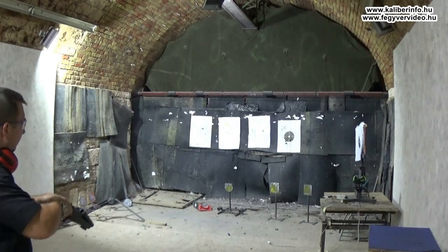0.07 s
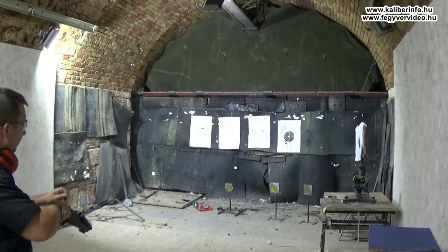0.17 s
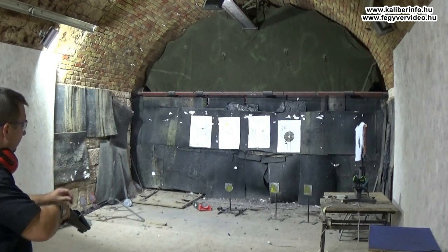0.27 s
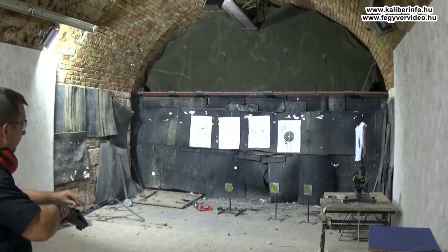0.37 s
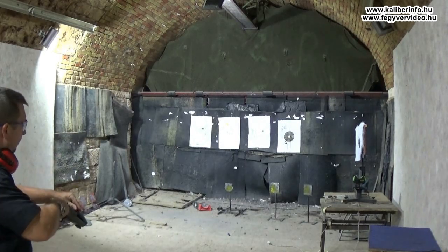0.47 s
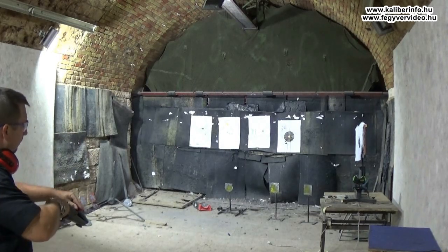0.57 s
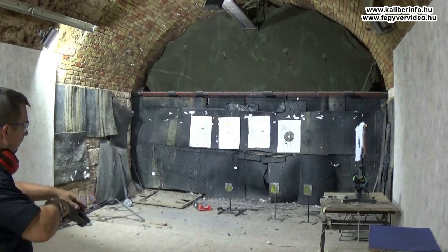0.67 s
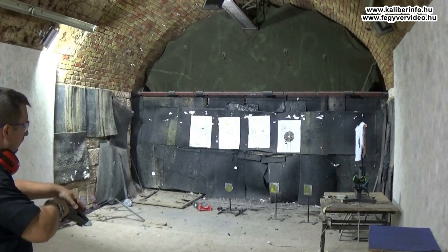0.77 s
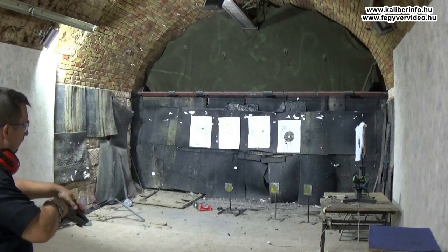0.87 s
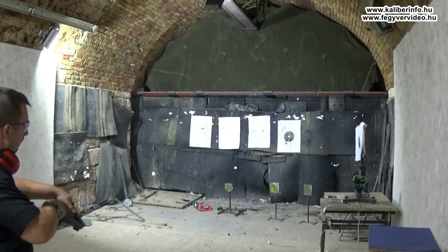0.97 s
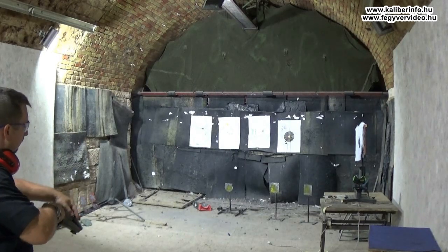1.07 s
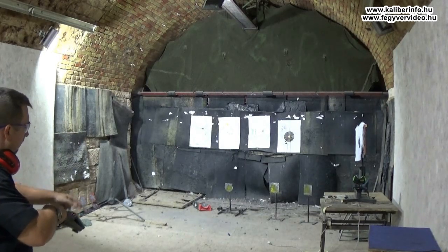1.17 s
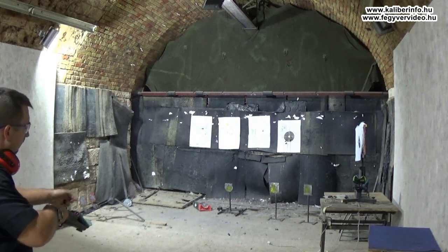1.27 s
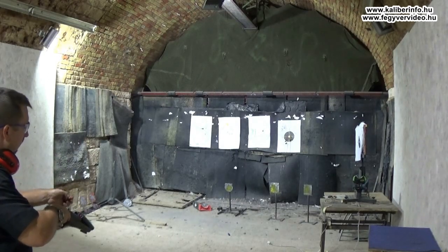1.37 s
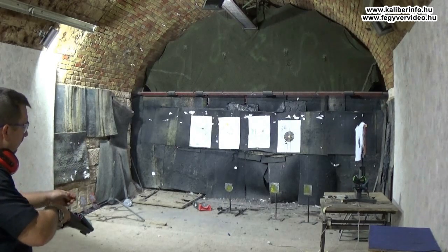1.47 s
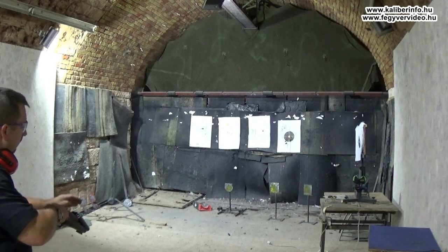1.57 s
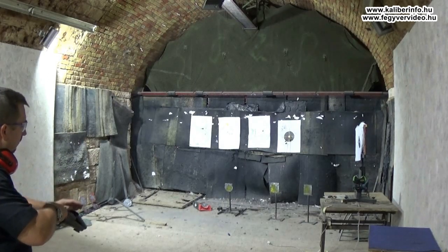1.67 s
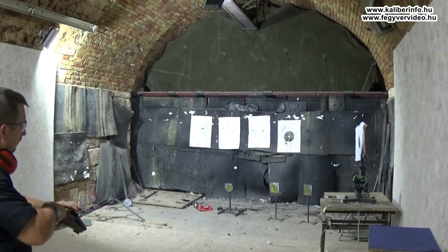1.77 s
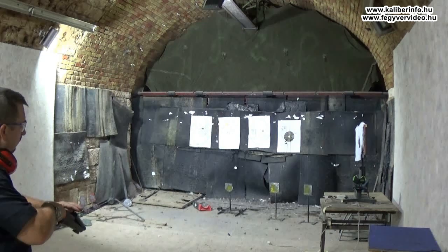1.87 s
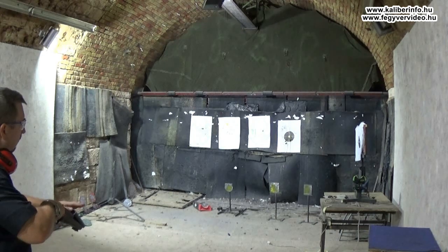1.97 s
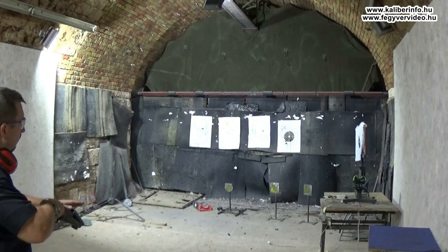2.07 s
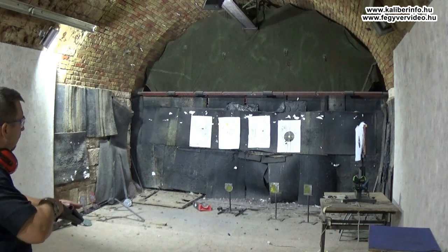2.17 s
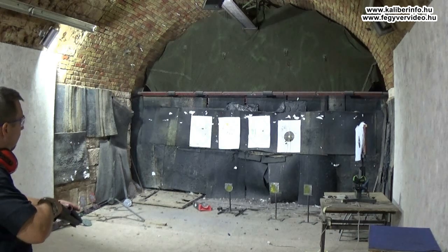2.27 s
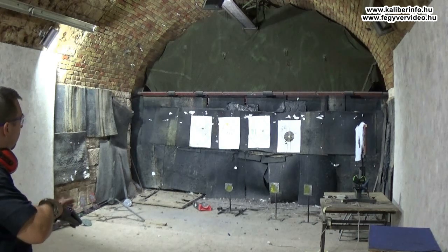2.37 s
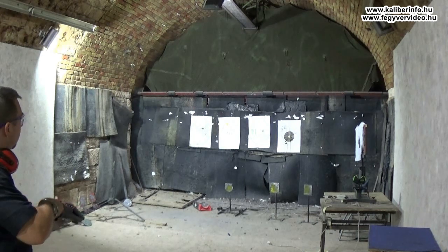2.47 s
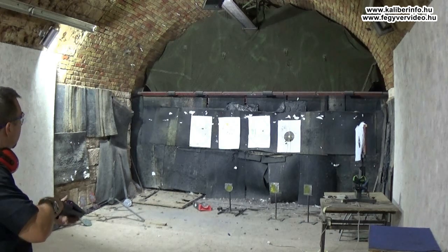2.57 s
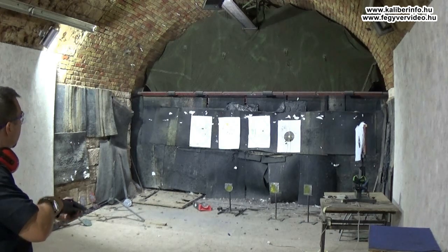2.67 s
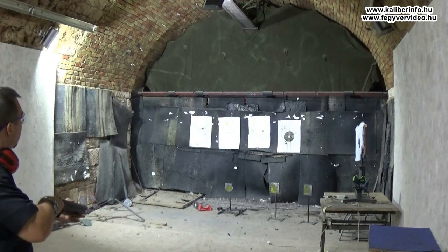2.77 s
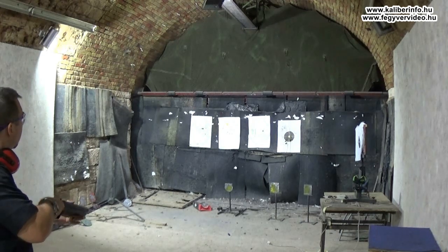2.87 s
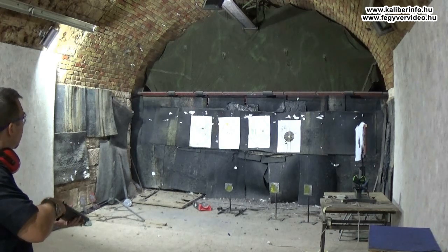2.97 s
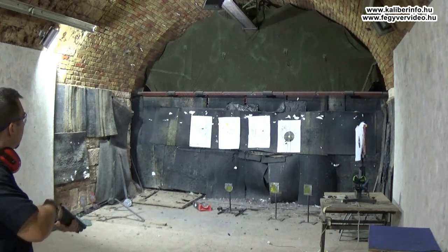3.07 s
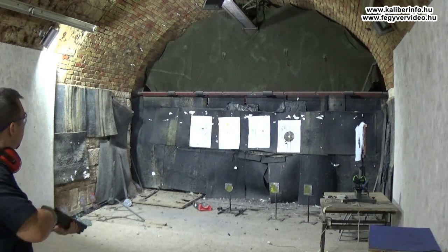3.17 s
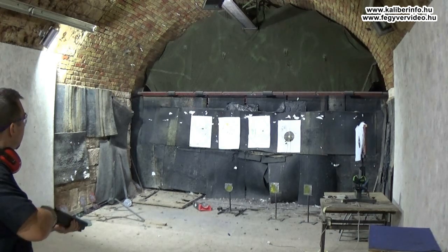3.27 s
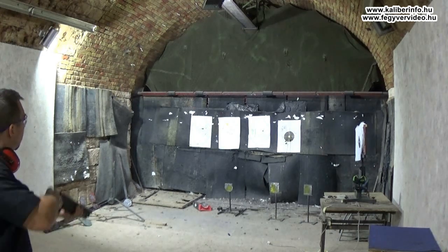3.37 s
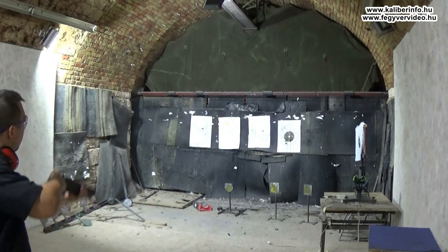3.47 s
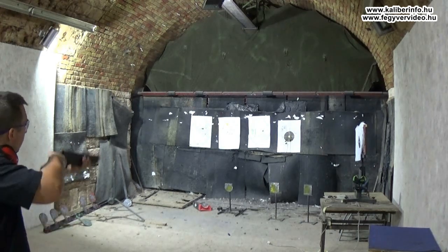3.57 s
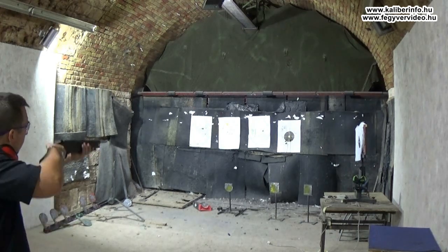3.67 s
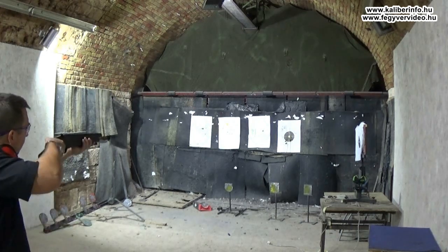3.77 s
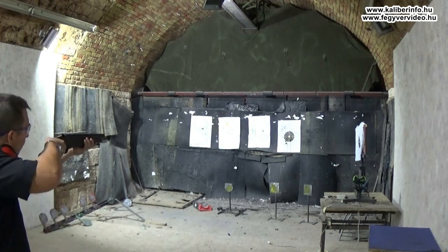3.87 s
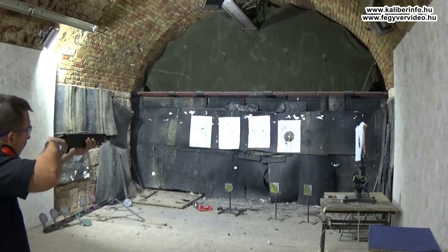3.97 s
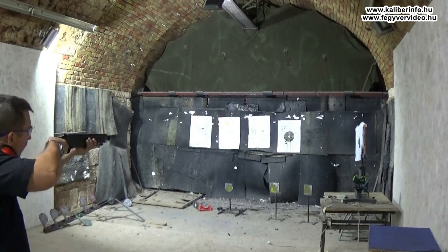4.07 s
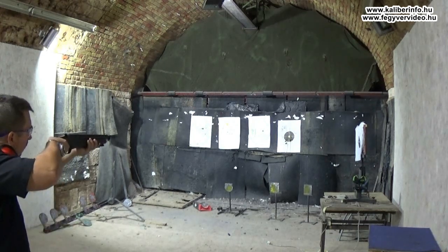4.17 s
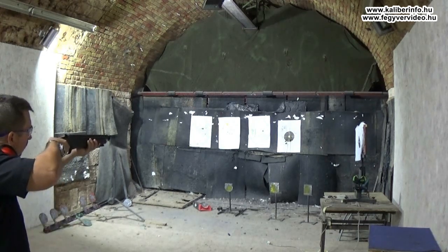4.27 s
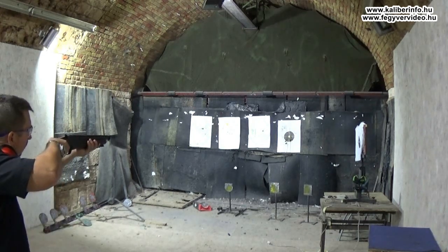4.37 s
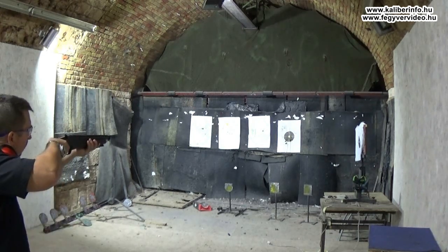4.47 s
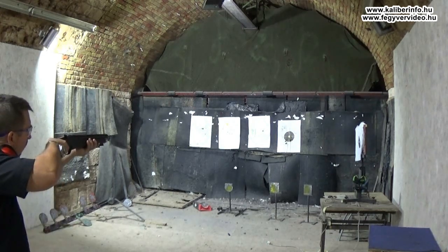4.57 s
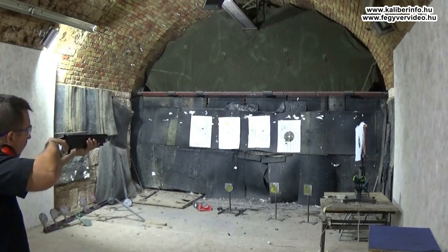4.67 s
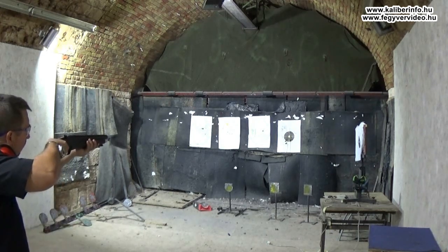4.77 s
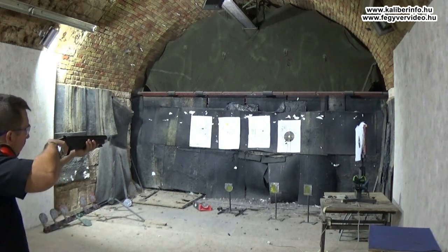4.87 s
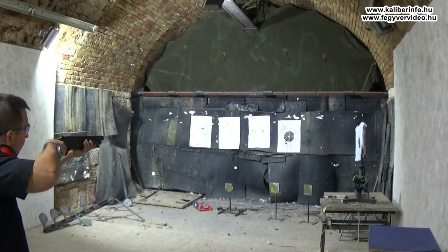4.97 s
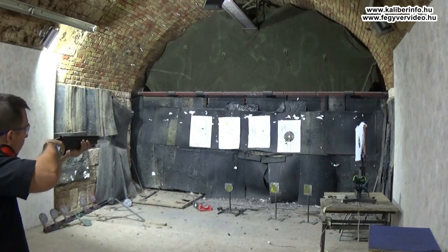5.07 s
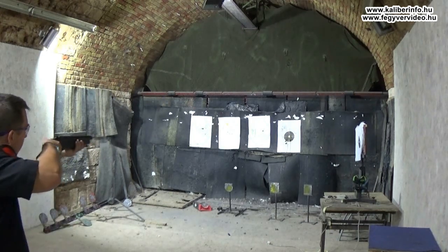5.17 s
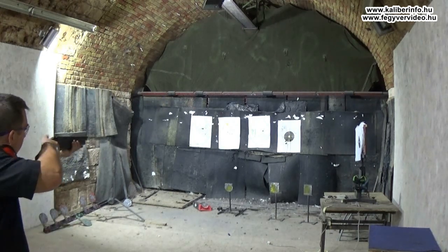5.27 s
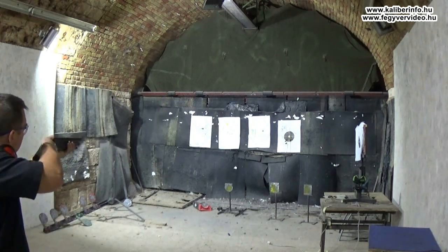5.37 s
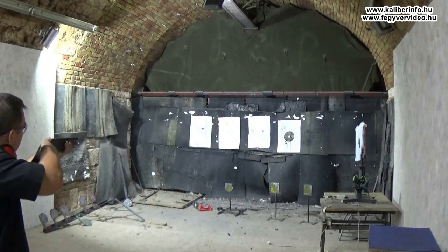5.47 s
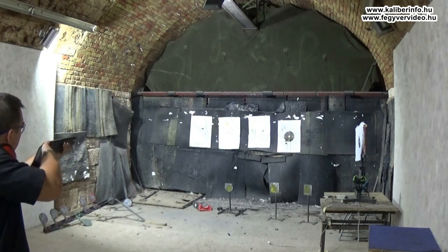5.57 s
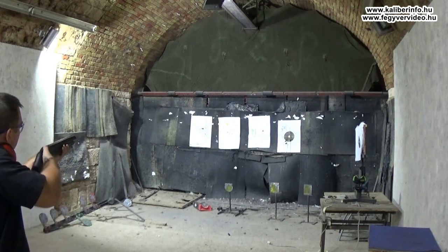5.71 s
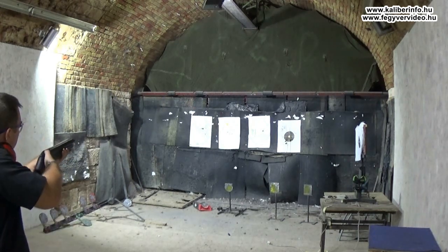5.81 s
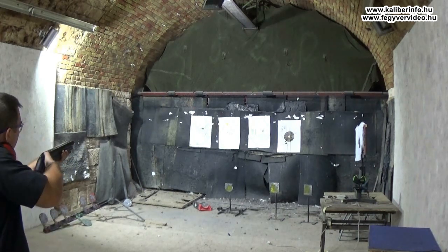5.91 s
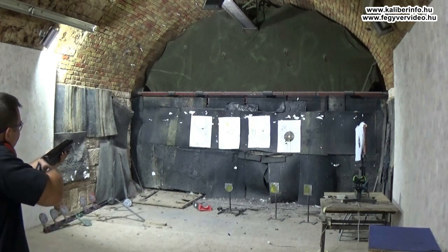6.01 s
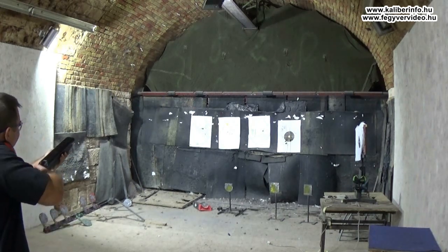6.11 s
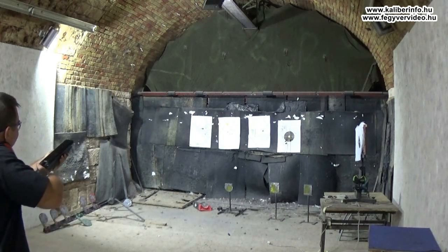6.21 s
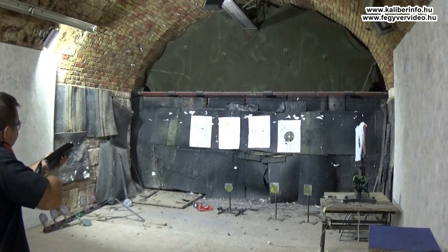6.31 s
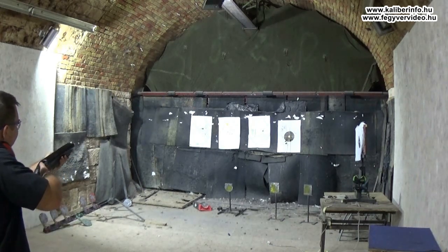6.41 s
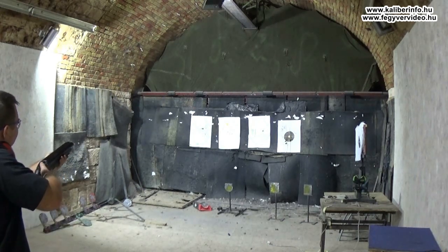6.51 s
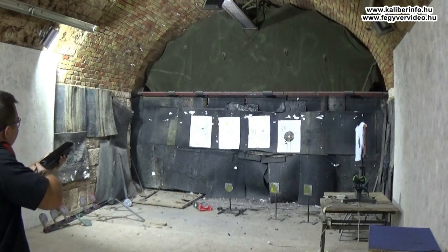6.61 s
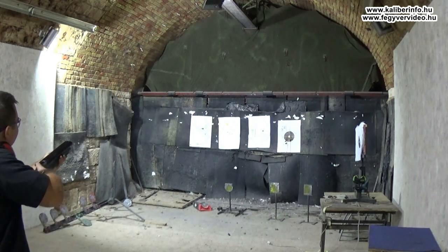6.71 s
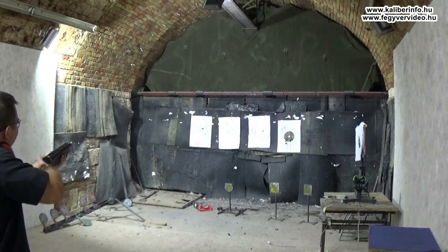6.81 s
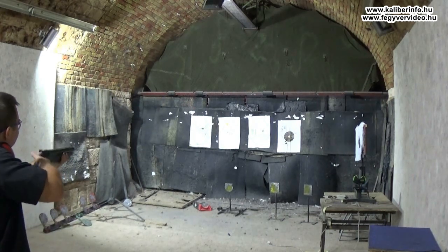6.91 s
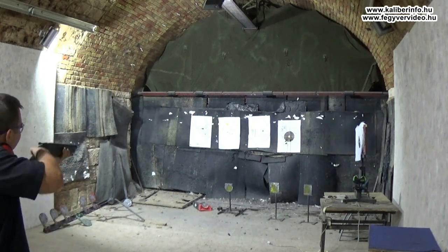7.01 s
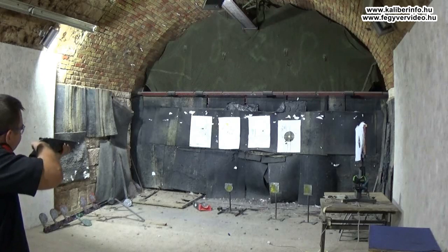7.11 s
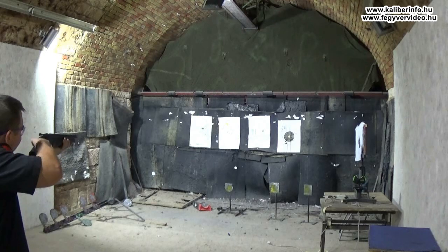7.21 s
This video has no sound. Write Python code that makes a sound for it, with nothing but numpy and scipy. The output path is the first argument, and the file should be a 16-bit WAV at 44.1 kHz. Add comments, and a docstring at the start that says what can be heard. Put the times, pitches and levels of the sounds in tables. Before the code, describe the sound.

A stereo pickup in a brick-vaulted indoor range, slightly left-weighted, with quiet wide air noise throughout. From 0 to 1.7 s a gas marker is loaded: irregular short dry thuds, brushing ticks and clicks over low shuffling, ending with a crisp click at 1.68 s and a tiny high spring ring. At 2.04 s a dull distant boom swells without a sharp front and rolls away as the shuffling fades. Bright ringing steel snaps at 2.2 and 2.7 s lead straight into a loud, hard action slam at 2.73 s; a double snap follows at 2.95 s. Faint light clicks at 3.7-4.2 s. At 4.6 s one explosive, bright gas crack bursts and hisses; about 0.13 s later the ball smacks the backstop, and the vault rings over a second. Catches click around 6.0 s, a weaker far boom swells at 6.3 s, a sharp snap comes at 6.6 s, and a faint tick at 7.0 s.

```python
"""A CO2 marker fires once in a vaulted brick range: valve spit, gas blast, hiss, ball on the backstop.
Before and after, its steel catches snap and ring; the action slams shut; loading knocks and clicks.
Impacts are minimum-phase pulses through a noise burst and a vault tail with standing waves.
Two dull booms, likely shots in another gallery, swell in as filtered noise without a direct path.
Low shuffling and air noise lie beneath. A look-ahead limiter holds the peaks down."""
import sys
import numpy as np
from scipy import signal
from scipy.fft import rfft, irfft, next_fast_len
from scipy.io import wavfile
from scipy.ndimage import uniform_filter1d, minimum_filter1d

SR = 44100
rng = np.random.default_rng(int(sys.argv[2]) if len(sys.argv) > 2 else 0)


def store_pcm(level_fs):
    """Save levels as 16-bit WAV."""
    pcm = np.round(np.clip(level_fs, -1, 1) * 32767).astype(np.int16)
    wavfile.write(sys.argv[1], SR, np.atleast_2d(pcm).T)


N = 319725
T = np.arange(2 * SR) / SR  # time since an onset, s

SHOT_S, SPIT_LEAD_S, HISS_DELAY_S, FLIGHT_S = 4.5976, 0.0051, 0.0274, 0.132
SPIT_DB, BLAST_DB, HISS_DB, BALL_DB = 18.5, 27, 2.5, 25
# gas blast spectrum: [f/Hz, level/dB]
BLAST_SPECTRUM = [(30, -28), (80, -16), (140, -15), (300, -5), (500, -3), (750, -2), (1000, -5.5),
                  (1500, -5), (2400, 1), (3300, 1.5), (4200, -2.5), (5200, 1.5), (7800, -2.5),
                  (10000, -11.5), (14000, -30)]
# spectrum of gas leaving the barrel: [f/Hz, level/dB]
HISS_SPECTRUM = [(300, -33.5), (2500, -15), (4000, -6), (5100, 0), (6500, -4.5), (7800, -3.5),
                 (10000, -12.5), (14000, -26)]
# hiss decay: [f/Hz, t60/s]
HISS_DECAY = [(1000, 1), (3500, 0.69), (6000, 0.55), (9000, .5), (13000, 0.35)]
# ball on the backstop, spectrum: [f/Hz, level/dB]
BALL_SPECTRUM = [(200, -28.5), (900, -24.5), (2800, -2), (5000, -5.5), (9000, -6.5), (14000, -25)]


def shot():
    """The valve spits, the gas blasts out and hisses on, then the ball hits the backstop."""
    out = np.zeros((2, N))
    gas = pulse(BLAST_SPECTRUM)
    opening = np.minimum(T[:SR // 2] / 0.005, 1)  # valve opens in 5 ms
    spit = coloured(opening * burst(t60_s=0.1, spike=0), gas)
    add(out, SHOT_S - SPIT_LEAD_S, amp(SPIT_DB) * spit)

    blast = heard(gas, burst(t60_s=0.15, spike=0.11), room_db=10.5, tail=vault(build_s=0.042))
    add(out, SHOT_S, amp(BLAST_DB) * blast)

    hiss = coloured(fading(diffuse(len(T)), HISS_DECAY), pulse(HISS_SPECTRUM))
    add(out, SHOT_S + HISS_DELAY_S, amp(HISS_DB) * hiss)

    impact = burst(t60_s=0.042, spike=0.6)
    ball = heard(pulse(BALL_SPECTRUM), impact, room_db=9.0, tail=vault(build_s=0.0075))
    add(out, SHOT_S + FLIGHT_S, amp(BALL_DB) * ball)
    return out


CATCH_BODY_DB, BODY_LOSS_DB_PER_DB = -6.5, 0.34  # harder snaps have less body, so are brighter
CATCH_RATTLE_T60_S, CATCH_RING_T60_S = 0.036, 0.68
# steel catches of action and trigger: [t/s, level/dB, ring f/Hz, ring level/dB, room/dB]
CATCH_EVENTS = [(2.203, 7.5, 5700, -33, 4.5), (2.71, 8, 5950, -43, 2.5), (2.9503, 6, 6950, -45, -2.5),
                (2.954, 4.5, 8670, -51.5, 0), (4.567, -23, 994, -52, 7), (6.0114, -7, 1053, -50, -2),
                (6.017, 2.5, 3740, -42, 0.5), (6.054, -4.5, 4200, -56, 4), (6.619, 6.5, 4500, -65, 3.5)]


def catches():
    """Steel catches snap over: a bright noise burst plus a mode cluster that rings on."""
    out = np.zeros((2, N))
    for t_s, db, ring_hz, ring_db, room_db in CATCH_EVENTS:
        body_db = CATCH_BODY_DB - BODY_LOSS_DB_PER_DB * db
        spectrum = [(100, body_db - 16.5), (400, body_db - 10), (1000, body_db + 3.5),
                    (2400, body_db + 5.5), (3800, -0.62), (6000, -0.28),
                    (9000, -6.5), (12000, -20), (14000, -36.5)]
        direct = burst(CATCH_RATTLE_T60_S, spike=0.2)
        snap = heard(pulse(spectrum), direct, room_db, vault(build_s=0.0032))
        add(out, t_s, amp(db) * snap)
        add(out, t_s, amp(ring_db) * steel(ring_hz, CATCH_RING_T60_S))
    return out


SLAM_S, SLAM_DB, SLAM_ROOM_DB, SLAM_T60_S, FRAME_DB = 2.7298, 22, 4.5, 0.07, -21
# action slamming shut, spectrum: [f/Hz, level/dB]
SLAM_SPECTRUM = [(250, -45), (600, -26), (900, -12), (1300, -8), (1850, 0), (2500, -5), (3700, -1.5),
                 (5000, -3), (6500, -5), (9500, -13), (14000, -36.5)]
# frame modes, relative to FRAME_DB: [f/Hz, level/dB, t60/s]
FRAME_MODES = [(1584, -6.5, 0.45), (1640, -9, 1), (1860, 2, 0.41), (2083, -9.5, 0.43), (2260, -7.5, 0.9)]


def slam():
    """The action slams shut and excites the damped modes of the frame."""
    out = np.zeros((2, N))
    direct = burst(SLAM_T60_S, spike=0.4)
    knock = heard(pulse(SLAM_SPECTRUM), direct, SLAM_ROOM_DB, vault(build_s=0.006))
    add(out, SLAM_S, amp(SLAM_DB) * knock)
    add(out, SLAM_S, amp(FRAME_DB) * ring(FRAME_MODES))
    return out


FIDGET_SPAN_S, FIDGET_COUNT, FIDGET_DB, FIDGET_SCATTER_DB = (0.29, 1.8), 7, -23, 3.5
SPRING_S, SPRING_DB = 1.688, -32
# handling contacts: [t/s, treble level/dB, thud over treble/dB, body over treble/dB]
CONTACTS = [(0.0626, -21.5, 18.5, 19), (0.2246, -25.5, 29, 1.5), (0.384, -15, 5.5, 16),
            (0.4873, -22.5, -5.5, -0.5), (0.5515, -22.5, 29, 24.5), (0.6732, -24, 24.5, 13),
            (0.7807, -17.5, 17, 10.5), (0.9131, -18.5, 6, -2), (1.06, -23.5, 27, -5),
            (1.0856, -23.5, 17, 17), (1.2285, -21, 32.5, 24), (1.297, -18.5, 18, 1.5), (1.3222, -9, 19, 13),
            (1.4107, -20, 21.5, 3.5), (1.5014, -32.5, 33, 14.5), (1.5956, -11, 19.5, -2),
            (1.6838, -0.5, -7, 3), (2.6635, -12, 0, 0), (3.712, -14, -14.5, -11.5), (3.9955, -22.5, -1, 4),
            (4.2064, -19.5, -12, -1), (7.0, -19.5, -17, 5)]
# small spring modes, relative to SPRING_DB: [f/Hz, level/dB, t60/s]
SPRING_MODES = [(10420, -10, 0.43), (10690, -9, 0.49)]


def handling():
    """Knocks, clicks and faint finger ticks; the last loading click sets a small spring ringing."""
    out = np.zeros((2, N))
    tails = [vault(build_s=0.0047) for _ in range(4)]
    for k, (t_s, db, thud_db, body_db) in enumerate(CONTACTS):
        add(out, t_s, contact(db, thud_db, body_db, tails[k % len(tails)]))
    for k in range(FIDGET_COUNT):
        t_s = rng.uniform(*FIDGET_SPAN_S)
        db = FIDGET_DB + FIDGET_SCATTER_DB * rng.standard_normal()
        add(out, t_s, contact(db, thud_db=2, body_db=2.5, tail=tails[k % len(tails)]))
    add(out, SPRING_S, amp(SPRING_DB) * ring(SPRING_MODES))
    return out


# (light touch, heavy knock), interpolated over thud level 0 to HEAVY_THUD_DB
HEAVY_THUD_DB = 20.5
CLICK_T60_S, CLICK_SPIKE, CLICK_ROOM_DB = (0.05, 0.017), (0.3, 1), (2, -2)


def contact(db, thud_db, body_db, tail):
    """One touch on the marker: a heavy one is a short, dry thud, a light one brushes and ticks."""
    spectrum = [(50, thud_db - 31.5), (170, thud_db - 15), (520, thud_db), (1400, body_db),
                (2100, body_db / 2 - 4.5), (2700, body_db / 2 - 2.5),
                (4000, -1.6), (9000, -6.5), (14000, -39.5)]
    weight = [0, HEAVY_THUD_DB]
    t60_s = np.interp(thud_db, weight, CLICK_T60_S)
    spike = np.interp(thud_db, weight, CLICK_SPIKE)
    room_db = np.interp(thud_db, weight, CLICK_ROOM_DB)
    return amp(db) * heard(pulse(spectrum), burst(t60_s, spike), room_db, tail)


# far shots: [t/s, level/dB, swell/s]
BOOM_EVENTS = [(2.043, -8, 0.086), (6.292, -11.5, 0.089)]
# boom spectrum: [f/Hz, level/dB]
BOOM_SPECTRUM = [(18, -68.5), (30, -32.5), (138, -10), (202, -10), (235, -0.5), (362, -0.5), (571, 1),
                 (858, -6), (974, -3.5), (1050, -7), (1190, -6), (1500, -13), (5480, -21), (9340, -27.5),
                 (13000, -56.5)]
# boom stereo width: [f/Hz, side minus mid/dB]
BOOM_SIDE = [(40, -10), (80, -18), (160, -15.5), (300, -14), (600, -10), (1300, -5.5), (2500, -5),
             (5000, -5.5), (9000, -12), (13000, -14)]
# boom decay: [f/Hz, t60/s]
BOOM_DECAY = [(100, 1.19), (260, 1.185), (700, 1.136), (1800, 1.02), (5000, 0.8), (11000, 0.47)]
# wall slaps, alike for every boom: [delay/s, peak over boom level/dB]
WALL_SLAPS = [(0.068, -2), (.092, -4), (.095, -0.5), (0.141, -0.5)]
# slap spectrum, duller than the boom: [f/Hz, level/dB]
SLAP_SPECTRUM = [(30, -36), (140, -10), (240, -1.5), (570, 1.5), (1200, -5), (1600, -12.5), (5500, -31.5),
                 (9300, -41.5), (13000, -69.5)]


def booms():
    """Far shots have no direct path: their echoes pile up, slap off the walls and die away."""
    out = np.zeros((2, N))
    modes = [(hz, db + along(BOOM_SPECTRUM, hz), t60_s) for hz, db, t60_s in ARCH_MODES]
    for t_s, db, swell_s in BOOM_EVENTS:
        echoes = fading(diffuse(len(T), BOOM_SPECTRUM, BOOM_SIDE), BOOM_DECAY)
        roar = echoes + amp(3.5) * ring(modes)
        swell = 1 - np.exp(-(T / swell_s) ** 1.37)
        add(out, t_s, amp(db) * roar * swell)
        for delay_s, slap_db in WALL_SLAPS:
            slap = pulse(SLAP_SPECTRUM)
            add(out, t_s + delay_s, amp(db + slap_db) * slap / np.abs(slap).max())
    return out


SHUFFLE_FADE_DB_PER_S = 57  # after the last table row
# low shuffling in the hall: [t/s, level/dB]
SHUFFLE_LEVEL = [(0.0, -45), (0.38, -55), (0.82, -46.5), (1.19, -53.5), (1.39, -57.5), (2.03, -50.5)]
# shuffling spectrum: [f/Hz, level/dB]
SHUFFLE_SPECTRUM = [(30, -36.5), (70, -18), (120, -5.5), (280, 2), (500, -3.5), (900, -9.5), (1600, -13.5),
                    (2400, -21.5), (4000, -34), (9000, -50.5)]


def shuffling():
    """Low noise of uneven level that fades out quickly after two seconds."""
    t = np.arange(N) / SR
    fade_db = -SHUFFLE_FADE_DB_PER_S * np.maximum(t - SHUFFLE_LEVEL[-1][0], 0)
    return amp(curve(SHUFFLE_LEVEL) + fade_db) * diffuse(N, SHUFFLE_SPECTRUM)


# air noise: [t/s, level/dB]
AIR_LEVEL = [(0, -61.5), (3.5, -58), (4.4, -62), (5.6, -64.5), (7.25, -59)]
# air noise spectrum: [f/Hz, level/dB]
AIR_SPECTRUM = [(15, -46.5), (25, -15.5), (113, -4.5), (155, -6), (192, -6), (225, -3.5), (257, -5.5),
                (569, -8.5), (802, -10.5), (1330, -13), (3440, -13), (4730, -17), (11900, -22),
                (14000, -45.5)]
# air noise stereo width: [f/Hz, side minus mid/dB]
AIR_SIDE = [(40, -14.5), (250, -8), (700, 0.5), (2000, -2), (5000, -8), (9000, -9.2), (13000, -14)]


def air():
    """Continuous wide noise whose level drifts slowly."""
    return amp(curve(AIR_LEVEL)) * diffuse(N, AIR_SPECTRUM, AIR_SIDE)


# vault tail spectrum; brick and curtains swallow treble: [f/Hz, level/dB]
VAULT_SPECTRUM = [(60, 4), (300, 2.5), (1400, 2.5), (3000, 0), (6000, -3), (12000, -2)]
# vault decay: [f/Hz, t60/s]
VAULT_DECAY = [(100, 0.85), (260, 1.38), (450, 1.22), (700, 1.133), (1800, 0.94), (3200, 0.82),
               (5000, 0.69), (8000, 0.57), (10500, 0.48), (13000, .36)]
# standing waves under the arch, relative: [f/Hz, level/dB, t60/s]
ARCH_MODES = [(184, -20.5, 1.6), (221, -34, 1.6), (258, -24.5, 1.8), (264, -33, 1.7), (316, -31, 1.5),
              (331, -28, 1.8), (458, -35, 1.6), (662, -36, 1.7), (700, -34, 1.6)]


def vault(build_s):
    """A diffuse tail of about unit energy that builds up, with standing waves under the arch."""
    opposed = ring(ARCH_MODES) * np.array([[1], [-1]])  # left against right
    standing = ring(ARCH_MODES) + amp(-23.5) * opposed
    tail = fading(diffuse(len(T), VAULT_SPECTRUM), VAULT_DECAY) + standing
    return amp(-35) * tail * (1 - np.exp(-T / build_s))


def heard(shape, direct, room_db, tail):
    """A pulse shape arrives directly and as the vault's answer."""
    paths = amp(room_db) * tail
    paths[:, :direct.shape[1]] += direct
    return coloured(paths, shape)


def burst(t60_s, spike):
    """A sharp front from ahead and a decaying noise rush; stereo, its mid of unit energy."""
    t = T[:SR // 2]
    rush = diffuse(len(t)) * amp(-60 * t / t60_s)
    rush /= np.linalg.norm(rush.mean(axis=0))
    rush[:, 0] += spike
    return rush / np.linalg.norm(rush.mean(axis=0))


def ring(modes):
    """Damped sines of random phase from (Hz, dB, t60 s) rows."""
    out = np.zeros(len(T))
    for hz, db, t60_s in modes:
        out += amp(db - 60 * T / t60_s) * np.sin(2 * np.pi * (hz * T + rng.random()))
    return out


def steel(hz, t60_s):
    """A small steel part: 12 close modes, scattered by 3.2 % of the pitch, beat and decay."""
    cluster = np.zeros(len(T))
    for _ in range(12):
        mode_hz = hz * (1 + 0.032 * rng.standard_normal())
        cluster += np.sin(2 * np.pi * (mode_hz * T + rng.random()))
    return unit(cluster) * amp(-60 * T / t60_s)


def pulse(spectrum, size=2048):
    """Minimum-phase pulse of a (Hz, dB) spectrum; each one has its own small random resonances."""
    hz = np.fft.rfftfreq(size, 1 / SR)
    noise = rng.standard_normal(len(hz))
    ripple = unit(uniform_filter1d(uniform_filter1d(noise, size=7), size=5))
    depth_db = 2.2 * hz / (hz + 800)
    # folded cepstrum gives minimum phase
    cepstrum = irfft(np.log(amp(along(spectrum, hz) + depth_db * ripple)))
    cepstrum[1:size // 2] *= 2
    cepstrum[size // 2 + 1:] = 0
    return irfft(np.exp(rfft(cepstrum)))


# default stereo width, bass nearly mono: [f/Hz, side minus mid/dB]
VAULT_SIDE = [(40, -16), (150, -24), (300, -24), (600, -12.5), (1300, -6.5), (2500, -7), (5000, -7),
              (9000, -9.5), (13000, -23)]


def diffuse(count, spectrum=((1000, 0),), width=VAULT_SIDE):
    """Stereo noise of rms 1 from independent mid and side signals."""
    m = next_fast_len(count)
    hz = np.fft.rfftfreq(m, 1 / SR)
    mid, side = rfft(rng.standard_normal((2, m))) * amp(along(spectrum, hz))
    side = side * amp(along(width, hz))
    return unit(irfft(np.array([mid + side, mid - side]), m)[:, :count])


def fading(x, t60s):
    """Each frequency of x dies at its own speed, from (Hz, t60 s) rows."""
    hz, t, z = signal.stft(x, SR, nperseg=512)
    decay = amp(-60 * t / along(t60s, hz)[:, None])
    return signal.istft(z * decay, SR)[1][:, :x.shape[-1]]


def coloured(x, shape):
    """Both channels of x take the spectrum of a pulse shape by convolution."""
    return signal.fftconvolve(x, shape[None], axes=1)


def amp(db):
    """Decibels to gain."""
    return 10 ** (np.asarray(db) / 20)


def unit(x):
    """Scaled to rms 1."""
    return x / np.sqrt(np.mean(x ** 2) + 1e-20)


def along(points, hz):
    """(Hz, value) points read on a log frequency axis."""
    f, v = np.transpose(points)
    return np.interp(np.log(hz + 1), np.log(f + 1), v)


def curve(rows):
    """(s, value) rows, one value per sample."""
    return np.interp(np.arange(N) / SR, *np.transpose(rows))


def add(track, t_s, sound):
    """Mix a sound in at t_s, cut at the end of the track."""
    start = max(round(t_s * SR), 0)
    part = sound[..., :N - start]
    track[:, start:start + part.shape[-1]] += part


def scene():
    """Sum of all sources, balanced a little to the left."""
    marker = shot() + catches() + slam() + handling()
    surroundings = booms() + shuffling() + air()
    return (marker + surroundings) * amp([[0.3], [-0.3]])


def limiter(x, ceiling_db, hold_s):
    """Looks ahead 1 ms and turns both channels down while peaks pass the ceiling."""
    need = np.minimum(1, amp(ceiling_db) / (np.abs(x).max(axis=0) + 1e-9))
    ahead, size = SR // 1000, int(hold_s * SR)
    held = minimum_filter1d(need, size, origin=(size - 1) // 2 - ahead)
    return x * uniform_filter1d(held, ahead)


TOP_HZ = 14300


def record(dry):
    """Limits the peaks, then removes everything from TOP_HZ up."""
    m = next_fast_len(N + SR // 2)
    keep = np.fft.rfftfreq(m, 1 / SR) < TOP_HZ
    limited = limiter(dry, ceiling_db=-6.0, hold_s=0.013)
    return irfft(rfft(limited, m) * keep, m)[:, :N]


dry = scene()
out = record(dry)
store_pcm(out)
```